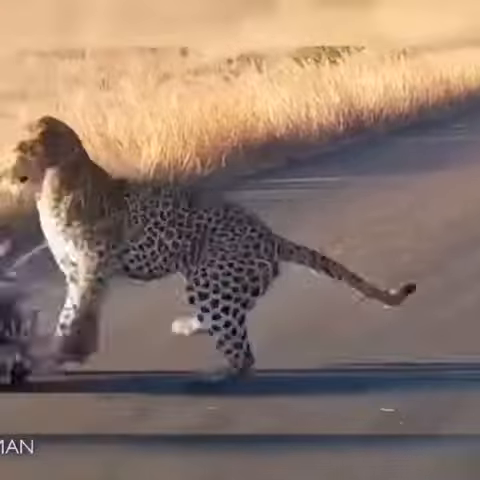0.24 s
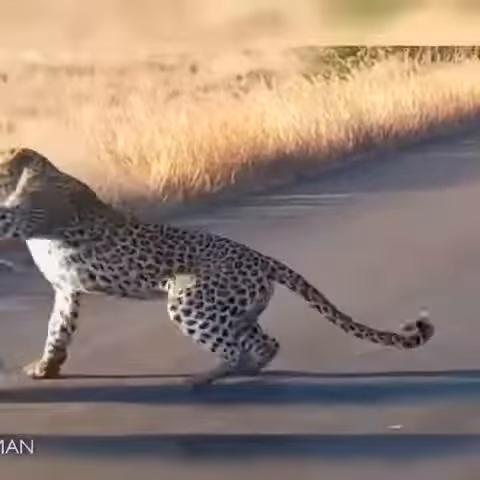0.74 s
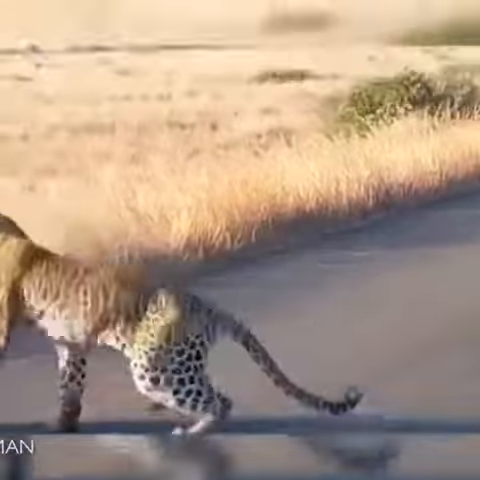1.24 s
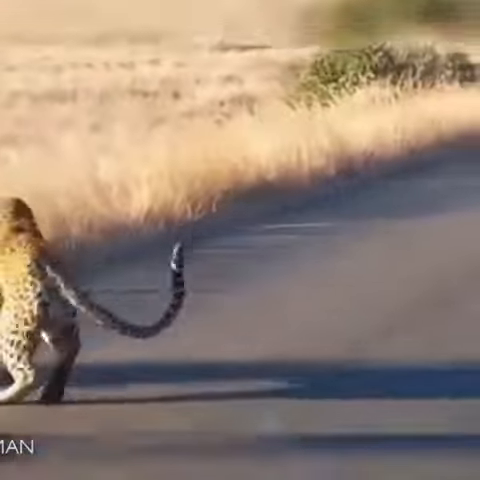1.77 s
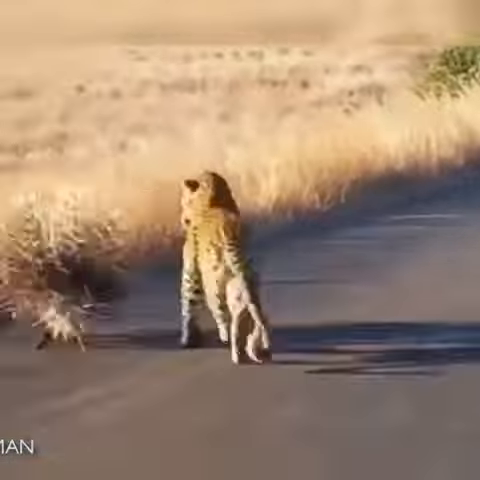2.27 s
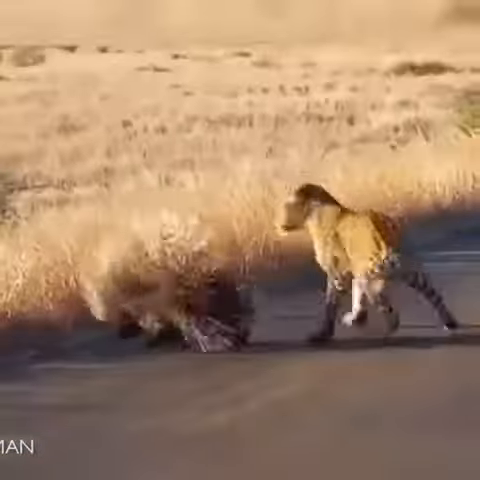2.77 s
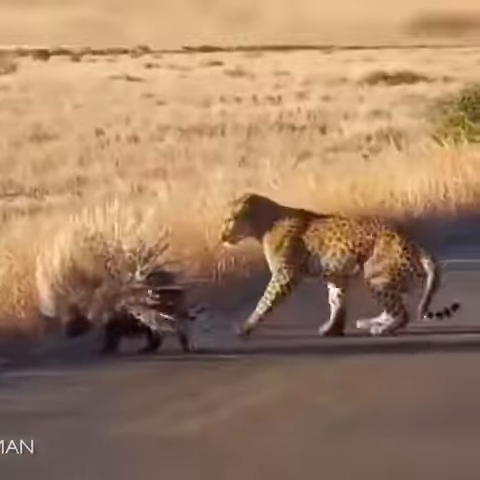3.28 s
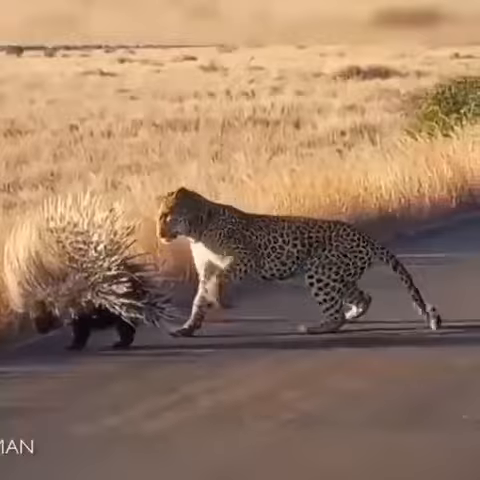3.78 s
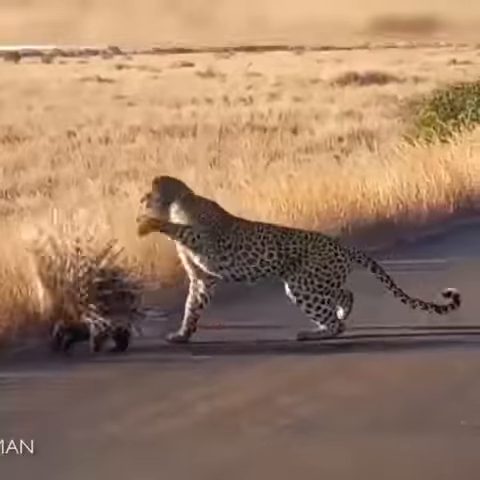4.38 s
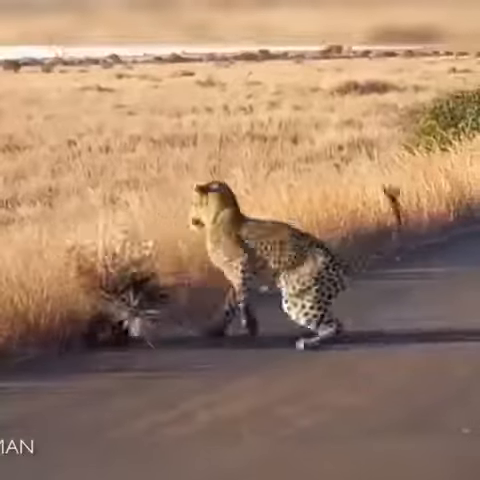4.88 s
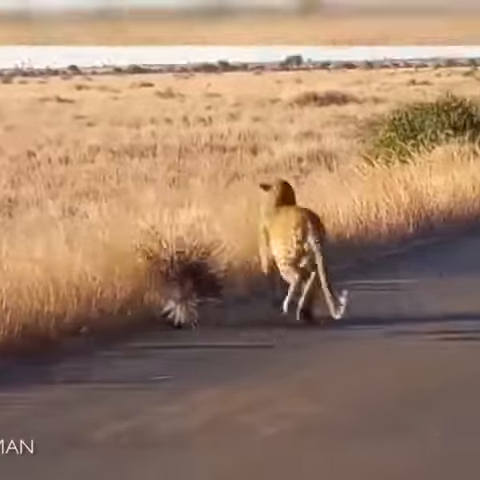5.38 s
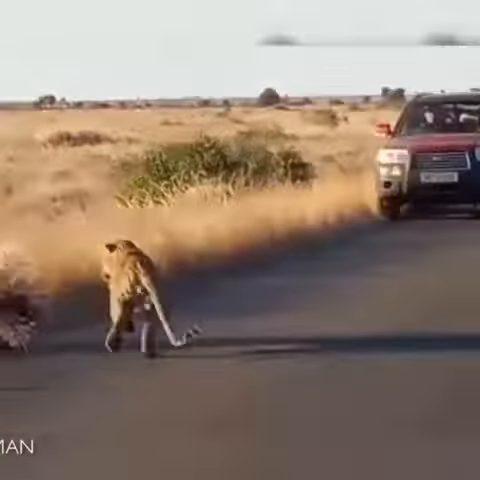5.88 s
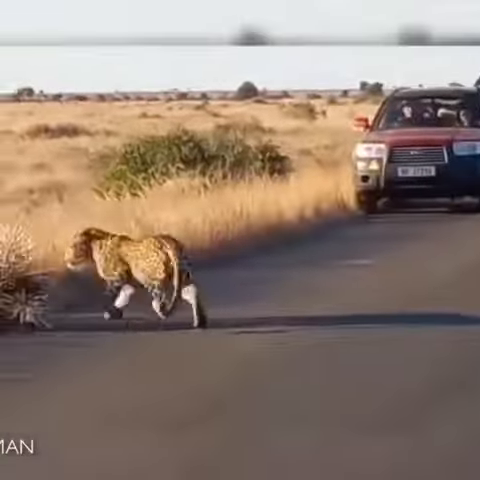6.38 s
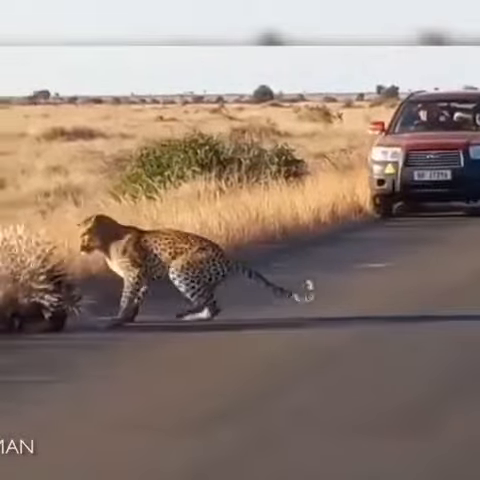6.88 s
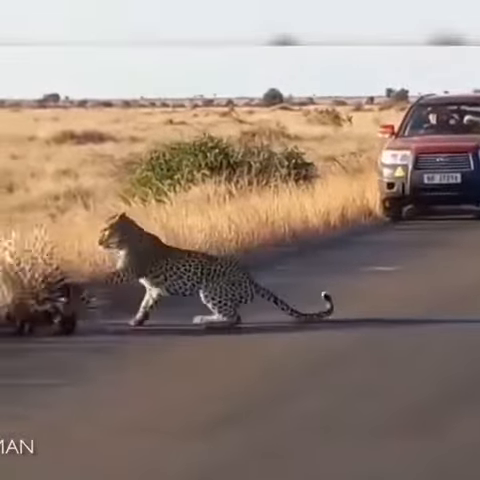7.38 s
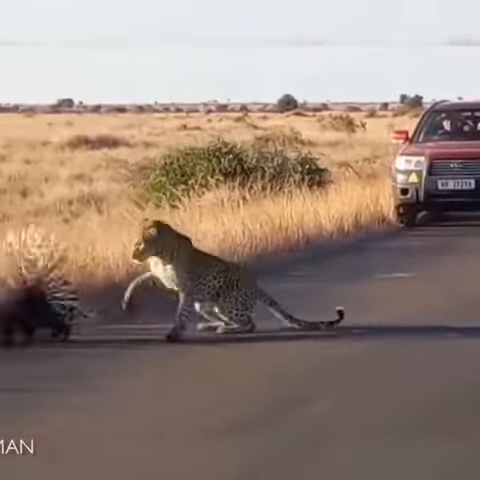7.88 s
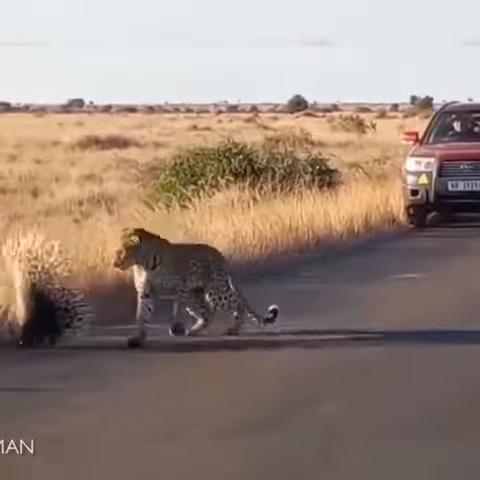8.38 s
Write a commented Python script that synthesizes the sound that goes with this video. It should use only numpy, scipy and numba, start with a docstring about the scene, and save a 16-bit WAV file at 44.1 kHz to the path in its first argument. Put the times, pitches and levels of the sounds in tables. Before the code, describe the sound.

Outdoors in open grassland, hollow porcupine quills knock together in a rapid, dry rattle. It flares loudly with hissing and huffing near the start, drops back, then flares again, slightly clipping the microphone. The quills fall almost still, resume at a moderate level and fade. A faint far bird whistles before a few snaps and a last light rattle. Soft wind and a low hum lie underneath.

```python
"""A porcupine shakes its tail about thirty times a second, on a road in open grassland: its hollow
quills knock together in a dry clatter. When it lunges, the long quills swish, air hisses through its
throat and it huffs; quill tips snap now and then. Far off, a bird whistles over wind and a low hum.
The microphone overloads on the two big bursts."""
import sys
import numpy as np
from scipy import signal
from scipy.fft import rfft, irfft
from scipy.io import wavfile
from scipy.ndimage import uniform_filter1d
from numba import njit

SR = 44100
rng = np.random.default_rng(int(sys.argv[2]) if len(sys.argv) > 2 else 0)


def transcribe(signal):
    """Save signal, clipped to [-1, 1], as a 16-bit WAV file at the path in sys.argv[1]."""
    frames = np.atleast_2d(signal).T
    limited = np.clip(frames, -1, 1)
    pcm = np.round(limited * 32767).astype(np.int16)
    wavfile.write(sys.argv[1], SR, pcm)


N = 381024

# The tail's rattle at the microphone:
# (time [s], middle quills [dB], thick quills re middle [dB], thin quills re middle [dB])
RATTLE_LEVELS = [(0.0, -37.5, -3, -19), (0.12, -41, -2, -25), (0.32, -53, 2.5, -6), (0.48, -35, 11, 6.5),
                 (0.58, -24, 4.5, 7.5), (0.62, -16.5, 2, -8.5), (0.74, -15.5, -8, -10),
                 (0.94, -37, -2, -6.5), (1.02, -35, -3, -12), (1.13, -46.5, -5, -19), (1.3, -44, -1, -26),
                 (1.65, -41.5, -1.5, -5.5), (2.02, -42, -1, -9), (2.26, -32, -17, -11),
                 (2.43, -39.5, -4, -10), (2.67, -42.5, -1.5, -7), (2.77, -18, -5, -7),
                 (2.85, -25, 3.5, -18), (2.93, -11, -6, -6), (3.17, -16, -4.5, -7.5), (3.22, -23, -4, -5.5),
                 (3.72, -57.5, -6, -11), (3.8, -61, -5.5, -9.5), (4.4, -62, -3.5, -5.5),
                 (4.55, -53, -6.5, -20), (4.78, -41.5, -4, -11.5), (4.93, -46.5, -6, -12),
                 (5.01, -38.5, -3.5, -11.5), (5.24, -35, -5.5, -5.5), (5.27, -31, -4, -3),
                 (5.56, -35, -7, -9), (5.88, -33.5, -3.5, -5.5), (6.2, -37, -3.5, -7.5),
                 (6.7, -47, -6.5, -12.5), (7.03, -50, -7, -14), (7.17, -63, -3, -1.5),
                 (7.65, -64.5, -2, -8), (7.84, -41.5, -11.5, -14), (7.97, -51.5, -7.5, -12),
                 (8.06, -41.5, -8.5, -9), (8.64, -51, -9, -13.5)]
# How strongly quills of each pitch sound: (pitch [Hz], relative level [dB])
QUILL_STRENGTH = [(850, -20), (1150, -12), (1500, -6.5), (1750, -1), (1950, 0), (2330, 0), (2800, -0.5),
                  (3600, -4), (4600, -7.5), (5300, -14), (6300, -23)]
# The commonest quill lengths: (pitch [Hz], share of knocks [fraction])
COMMON_QUILLS = [(1170, .07), (1500, .04), (1930, .08), (2330, .2), (2680, .03)]
# Edges of the thick, middle and thin quill classes: (pitch [Hz])
SIZE_EDGES_HZ = [900, 1600, 3100, 6300]


def rattle(swing_s, count=44000, cycles=38, detune=.035, jolt_db=5.0):
    """Many quills of every pitch knock at random, most strongly once per swing of the tail."""
    level_db, thick_db, thin_db = curve(RATTLE_LEVELS)
    when, pitch, ring, luck, pick = rng.random((count, 5)).T
    start, hz = samples(when * N), quill_pitch(pitch)
    common_hz, share = np.transpose(COMMON_QUILLS)
    kind = np.digitize(pick, np.cumsum(share))
    common = kind < len(share)
    hz[common] = common_hz[kind[common]] * (1 + detune * (2 * pitch[common] - 1))
    force_db = walk(60) + jolt_db * jolts(swing_s)
    # a few blows are harder than the rest
    luck_db = np.minimum(-2.6 * np.log(1 - luck), 12) * np.minimum(3000 / hz, 1)
    db = spectrum_db(QUILL_STRENGTH, hz) + force_db[start] + luck_db
    # thin quills ring on for more cycles
    turns = cycles * (.5 + ring) * np.sqrt(np.maximum(hz / 2000, 1))
    size = np.digitize(hz * (.85 + .3 * ring), SIZE_EDGES_HZ[1:3])  # the classes overlap in pitch
    classes = [size == k for k in range(3)]
    thick, middle, thin = (unit(quills(start[c], hz[c], db[c], turns[c])) for c in classes)
    return undb(level_db) * (middle + undb(thick_db) * thick + undb(thin_db) * thin)


# The swings heard as distinct knocks: (time [s], strength [dB], clearest pitch [Hz])
DISTINCT_SWINGS = [(0.0318, -24, 1560), (0.0642, -22, 1970), (0.181, -33, 1490), (0.377, -31, 1170),
                   (0.4192, -12.5, 1280), (0.4454, -13, 1180), (0.4703, -6, 2020), (0.5309, -5, 1440),
                   (0.5565, -4, 1180), (0.5946, 3, 1166), (0.6222, 3, 2130), (0.6544, 4.5, 2130),
                   (0.7054, 2, 2030), (0.7674, -16, 2330), (0.8455, -6, 2660), (0.8729, -12.5, 1127),
                   (0.9034, -16, 2290), (0.9324, -20, 2170), (0.9612, -15.5, 2150), (1.0016, -11, 2270),
                   (1.0242, -19, 2290), (1.0615, -25, 1200), (1.1084, -24.5, 1450), (1.192, -30, 2230),
                   (1.256, -27, 1930), (1.3339, -22, 2000), (1.4438, -23, 2260), (1.4721, -27, 2230),
                   (1.5308, -19.5, 2010), (1.5647, -19, 2310), (1.6587, -21, 2130), (1.6904, -23, 1140),
                   (1.726, -18.5, 1520), (1.7525, -18, 2270), (1.8168, -25, 2380), (1.8537, -17.5, 2380),
                   (1.8813, -20, 1890), (1.9325, -14, 2240), (1.9759, -20.5, 1520), (2.1066, -18, 2050),
                   (2.161, -20, 1920), (2.2337, -17, 2440), (2.3484, -19, 1980), (2.4937, -23, 2540),
                   (2.5646, -23, 2310), (2.6541, -21, 1980), (2.7048, -20, 1980), (2.7405, -7.5, 2330),
                   (2.7625, -3, 2400), (2.7964, -0.5, 2400), (2.8609, -4, 1900), (2.8892, 3.5, 1960),
                   (2.9191, 6, 1780), (2.9744, -2, 1830), (3.0634, 5, 2600), (3.0969, -1, 1950),
                   (3.1658, -2, 2180), (3.2033, -8, 1390), (3.2428, -7, 2650), (3.2804, -11, 2260),
                   (3.3541, -10, 2242), (3.4508, -22, 1820), (3.5244, -31, 1870), (3.5518, -23, 2590),
                   (4.3515, -42, 1920), (4.4134, -41.5, 1920), (4.4812, -38, 1920), (4.5734, -26, 2300),
                   (4.6064, -26, 2300), (4.6563, -26, 2300), (4.6929, -21.5, 2270), (4.7325, -28, 2580),
                   (4.7646, -22, 1950), (4.7924, -31, 1960), (4.8279, -27, 2270), (4.8648, -29, 1260),
                   (4.8983, -31, 1900), (4.9506, -36, 2320), (5.0145, -20, 1590), (5.0478, -22, 1420),
                   (5.1099, -22, 2630), (5.1607, -19, 2540), (5.2484, -18.5, 1720), (5.2774, -10, 1750),
                   (5.3048, -9, 1900), (5.3517, -13, 2600), (5.4453, -20, 2220), (5.5038, -25, 2460),
                   (5.6221, -11, 2700), (5.673, -14, 1910), (5.7127, -14.5, 1520), (5.7673, -18, 2280),
                   (5.8401, -16, 2400), (5.8736, -21.5, 1590), (5.914, -10.5, 2130), (5.9369, -21, 2700),
                   (5.9871, -14, 2270), (6.0324, -18, 1460), (6.097, -18, 1550), (6.1594, -16.5, 2370),
                   (6.1853, -19, 1530), (6.2567, -31, 2420), (6.2964, -21, 2240), (6.3521, -17, 2410),
                   (6.4029, -20, 2380), (6.4572, -23, 2400), (6.5657, -30, 2210), (6.7196, -29, 2410),
                   (6.8838, -26, 2270), (8.0172, -27, 2420), (8.0491, -23.5, 1900), (8.0855, -25, 2450),
                   (8.1574, -25.5, 2380), (8.2896, -22.5, 2230), (8.3296, -24, 1900), (8.4213, -26, 2270),
                   (8.5233, -25, 2230), (8.5646, -28.5, 2580)]


def tail_swings(shake_hz=29.55, jitter_s=.004, above_rattle_db=13, scatter_db=3.5, still_db=-58):
    """Every swing (s, dB, Hz): other swings fill the gaps between the distinct ones at the shaking rate."""
    distinct_s, distinct_db, distinct_hz = np.transpose(DISTINCT_SWINGS)
    rattle_db = curve(RATTLE_LEVELS)[0]
    gaps = zip(distinct_s, np.r_[distinct_s[1:], N / SR])
    s = np.concatenate([np.linspace(a, b, max(round((b - a) * shake_hz), 1) + 1)[1:-1] for a, b in gaps])
    s = s[rattle_db[samples(s * SR)] > still_db]  # any quieter and the tail hangs still
    late, luck, pick, pitch = rng.random((N // 500, 4))[:len(s)].T
    s = s + jitter_s * (2 * late - 1)
    db = rattle_db[samples(s * SR)] + above_rattle_db + scatter_db * (2 * luck - 1)
    common_hz, share = np.transpose(COMMON_QUILLS)
    kind = np.minimum(np.digitize(pick * share.sum(), np.cumsum(share)), len(share) - 1)
    hz = common_hz[kind] * (.93 + .14 * pitch)
    return np.r_[distinct_s, s], np.r_[distinct_db, db], np.r_[distinct_hz, hz]


def knocks(s, db, hz, cycles=40, clear_db=-4, bunch_db=-13.0, spread_s=.0062, count=8):
    """A swing sounds one quill clearly and a bunch of others just after."""
    late, pitch = rng.random((len(s), count, 2)).T
    other_hz = quill_pitch(pitch)
    other_db = db + bunch_db + spectrum_db(QUILL_STRENGTH, other_hz)
    start = samples(np.r_[s, (s + spread_s * late).ravel()] * SR)
    return quills(start, np.r_[hz, other_hz.ravel()], np.r_[db + clear_db, other_db.ravel()], cycles)


def jolts(swing_s, decay_s=.019, swell_s=.006):
    """Each swing shakes the whole bundle for a moment: a swell towards 1, then a fall to 0."""
    kicks = np.zeros(N)
    kicks[samples(swing_s * SR)] = 1
    shaking = signal.lfilter([1], [1, -np.exp(-1 / (decay_s * SR))], kicks)
    return uniform_filter1d(np.minimum(shaking, 1), int(swell_s * SR))


def quills(start, hz, db, cycles, contact_s=.0004):
    """Short hollow tubes ring for some cycles and radiate no bass."""
    ringing = rings(start, hz, cycles / hz, undb(db), np.exp(-1 / (contact_s * SR)))
    return signal.sosfilt(signal.butter(6, 930, "high", fs=SR, output="sos"), ringing)


@njit
def rings(start, hz, t60, amplitude, release):
    """Each knock is a sine that swells over the contact time and dies away."""
    out = np.zeros(N)
    for k in range(len(start)):
        pole = np.exp(2j * np.pi * hz[k] / SR - np.log(1000) / (t60[k] * SR))
        phasor, held = amplitude[k] + 0j, 1.
        for i in range(start[k], min(N, start[k] + int(t60[k] * SR))):
            out[i] += phasor.imag * (1 - held)
            phasor *= pole
            held *= release
    return out


def quill_pitch(chance):
    """Spreads draws of 0 to 1 evenly over the quills' octaves, in Hz."""
    return 900 * (6300 / 900) ** chance


# Lunges and turns on the road: (time [s], hold [s], swish level [dB], throat re swish [dB])
LUNGE_MOVES = [(0.05, 0.12, -60, -10.5), (0.34, 0.019, -57, -18), (0.47, .04, -22, -2),
               (0.56, 0.13, -26, 5), (1.33, .65, -53.5, 1.5), (2.089, 0.025, -43.5, 2.5),
               (2.17, .15, -35.5, 3.5), (2.49, 0.015, -49, -1), (2.72, .02, -42, 1),
               (2.801, 0.1, -27.5, 3.5), (3.02, 0.094, -27, 6), (4.48, 0.35, -62.5, -6.5),
               (5.06, 0.1, -57, -1), (5.3, 0.074, -44.5, 3), (5.82, 0.0068, -52, 16.5),
               (6.01, 0.026, -52.5, 12), (6.198, 0.1, -61, 9), (7.73, 0.019, -68, -1),
               (7.842, 0.013, -37, -13)]


def lunges(rise_db_s=240, fall_db_s=148.5, settle_db=-24.5, settle_db_s=53, brush_db=-23.5):
    """Gains of the swish and the throat hiss: both follow the rattle and surge at each lunge."""
    swish_gain = throat_gain = undb(curve(RATTLE_LEVELS)[0] + brush_db)
    for s, held_s, db, throat_db in LUNGE_MOVES:
        settling = undb(settle_db) * burst(s, held_s, rise_db_s, settle_db_s)  # quills settle slowly
        shape = burst(s, held_s, rise_db_s, fall_db_s) + settling
        swish_gain = swish_gain + undb(db) * shape
        throat_gain = throat_gain + undb(db + throat_db) * shape
    return swish_gain, throat_gain


# Hiss of long quills at the microphone: (frequency [Hz], relative density [dB])
SWISH_SPECTRUM = [(3000, -10.5), (5000, -7), (6400, -8.5), (7200, -5), (9500, 0), (11000, -5.5),
                  (12500, -13.5)]


def swish(gain, flicker_db=1.5, grass_db=-70.5):
    """Long quills brush each other in a fine hiss; dry grass keeps a faint swish going throughout."""
    return (gain + undb(grass_db)) * noise(SWISH_SPECTRUM) * undb(flicker_db * walk(24))


# Resonances of the throat: (centre [Hz], width [Hz], relative level [dB])
THROAT_RESONANCES = [(1200, 1400, -0.5), (1900, 1000, 4.5), (2700, 830, -10), (4400, 320, -12)]


def throat_hiss(gain):
    """Air rushing through the throat sounds its broad resonances."""
    air = signal.sosfilt(signal.butter(4, 900, "high", fs=SR, output="sos"), rng.standard_normal(N))
    bands = (undb(db) * signal.lfilter(*signal.iirpeak(hz, hz / width, SR), air)
             for hz, width, db in THROAT_RESONANCES)
    return gain * unit(sum(bands))


# Dry snaps of long quill tips: (time [s], starting level [dB])
TIP_SNAPS = [(0.3184, -35), (0.405, -27), (1.2922, -39.5), (2.0595, -34), (2.6886, -30), (2.7621, -37),
             (3.354, -40), (4.4787, -45.5), (4.542, -45), (5.121, -38.5), (5.252, -36), (5.9993, -45),
             (7.7069, -43.5), (7.7308, -43), (7.7867, -41), (7.84, -28), (7.9713, -43)]


def tip_snaps(t60_s=.03):
    """Each snap of a quill tip is a short spurt of treble noise."""
    t = np.arange(N) / SR
    gain = sum((t >= s) * undb(db - 60 * np.maximum(t - s, 0) / t60_s) for s, db in TIP_SNAPS)
    return gain * noise(SWISH_SPECTRUM)


# The animal's outward breaths: (time [s], hold [s], level [dB])
BREATHS = [(0.505, .01, -36), (0.568, 0.013, -23.5), (0.61, 0.066, -27.5), (1.622, 0.37, -53),
           (2.04, .08, -48), (2.18, 0.13, -46.5), (2.864, 0.015, -30), (2.93, .04, -31), (3.0, .01, -24),
           (3.05, 0.059, -29), (5.21, .02, -49), (5.29, 0.32, -54.5), (7.84, .02, -61)]
# Breath at the microphone: (frequency [Hz], relative density [dB])
BREATH_SPECTRUM = [(20, -43), (60, -13.5), (110, -9.5), (180, 1.5), (300, -3), (420, -9.5), (520, -7),
                   (750, -9), (950, -12.5), (1200, -25)]


def huffs(rise_db_s=331, fall_db_s=221, flutter_db=2.0):
    """Breath is blown out in low, fluttering puffs."""
    gain = sum(undb(db) * burst(s, held_s, rise_db_s, fall_db_s) for s, held_s, db in BREATHS)
    return gain * noise(BREATH_SPECTRUM) * undb(flutter_db * walk(30))


def ground_scatter(clatter, level_db=-13, t60_s=.03):
    """Road and grass scatter a short echo of every knock towards the microphone."""
    t = np.arange(int(.04 * SR)) / SR
    echo = rng.standard_normal(len(t)) * undb(-60 * t / t60_s)
    echo /= np.sqrt(np.sum(echo ** 2))
    return undb(level_db) * signal.fftconvolve(clatter, echo)[:N]


# A bird far from the microphone, one list per note: (time [s], pitch [Hz], level [dB])
BIRD_NOTES = [
    [(6.72, 4500, -76), (6.76, 4380, -57), (6.84, 4120, -66), (6.875, 3950, -50), (6.91, 3720, -52),
     (6.925, 3680, -62)],
    [(7.03, 3550, -76), (7.05, 3400, -72), (7.08, 3300, -73)],
    [(7.09, 3380, -64), (7.105, 3560, -60), (7.125, 3640, -56), (7.18, 3500, -55.5), (7.25, 3430, -65),
     (7.285, 3520, -71.5)],
]


def far_bird(flutter_db=2.3, fade_s=.012):
    """Thin, mostly falling whistles that flutter over the distance."""
    out = 0
    for note in BIRD_NOTES:
        hz, db = curve(note)
        begin, end = note[0][0], note[-1][0]
        gate = np.interp(np.arange(N) / SR, [begin - fade_s, begin, end, end + fade_s], [0, 1, 1, 0])
        tone = np.sqrt(2) * np.sin(2 * np.pi * np.cumsum(hz) / SR)
        out = out + undb(db + flutter_db * walk(60)) * gate * tone
    return out


# Ambience of the open grassland: (frequency [Hz], relative density [dB])
GRASSLAND_SPECTRUM = [(20, -46.5), (40, -18), (62, -8), (100, 2), (130, -4.5), (180, -6), (500, -10),
                      (750, -16), (1300, -24), (2200, -32), (3500, -33), (6000, -33.5), (9000, -33),
                      (12500, -50.5)]


def wind_and_hum(level_db=-54, swell_db=.7):
    """Wind in the grass and a far hum, swelling slightly."""
    return noise(GRASSLAND_SPECTRUM) * undb(level_db + swell_db * walk(3))


def undb(db):
    return 10 ** (np.asarray(db) / 20)


def unit(x):
    return x / np.sqrt(np.mean(x ** 2))


def samples(position):
    return position.astype(np.int64)


def curve(table):
    """Columns of a timed table, one value per sample."""
    s, *columns = np.transpose(table)
    return [np.interp(np.arange(N) / SR, s, c) for c in columns]


def spectrum_db(points, hz):
    """Level of a spectrum at hz, interpolated over log frequency."""
    f, db = np.transpose(points)
    return np.interp(np.log(np.maximum(hz, 1)), np.log(f), db)


def noise(points):
    """Noise with the given spectrum, rms 1."""
    gain = undb(spectrum_db(points, np.fft.rfftfreq(N, 1 / SR)))
    return unit(irfft(rfft(rng.standard_normal(N)) * gain, N))


def walk(rate_hz):
    """Random levels held for 1 / rate_hz seconds and smoothed twice, rms 1."""
    hold = int(SR / rate_hz)
    steps = np.repeat(rng.standard_normal(N // hold + 1), hold)
    return unit(uniform_filter1d(uniform_filter1d(steps, hold), hold)[:N])


def burst(s, held_s, rise_db_s, fall_db_s):
    """Gain that climbs to 1 at s, holds, then falls, both slopes straight in dB."""
    t = np.arange(N) / SR - s
    return undb(-rise_db_s * np.maximum(-t, 0) - fall_db_s * np.maximum(t - held_s, 0))


def scene():
    """At one microphone: the porcupine on the road, the bird and the grassland behind it."""
    swing_s, swing_db, swing_hz = tail_swings()
    swish_gain, throat_gain = lunges()
    clatter = rattle(swing_s) + knocks(swing_s, swing_db, swing_hz)
    ground = ground_scatter(clatter)
    porcupine = clatter + swish(swish_gain) + throat_hiss(throat_gain) + tip_snaps() + huffs()
    return (porcupine + ground + far_bird() + wind_and_hum())[None]


def record(dry):
    """The microphone clips on the loudest peaks, and the treble is cut above 11.7 kHz."""
    clipped = np.clip(dry, -.9, .9)
    return signal.sosfilt(signal.ellip(10, .2, 70, 11700, fs=SR, output="sos"), clipped)


dry = scene()
out = record(dry)
transcribe(out)
```